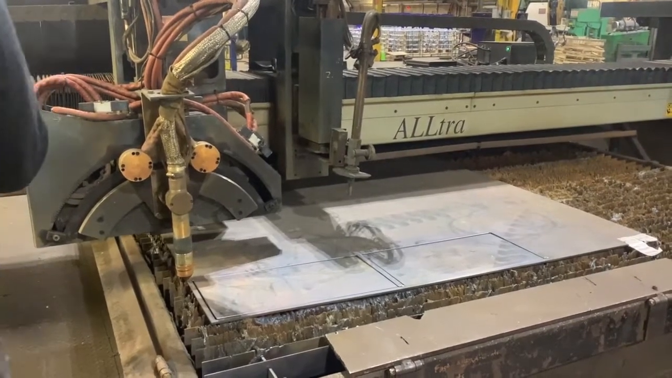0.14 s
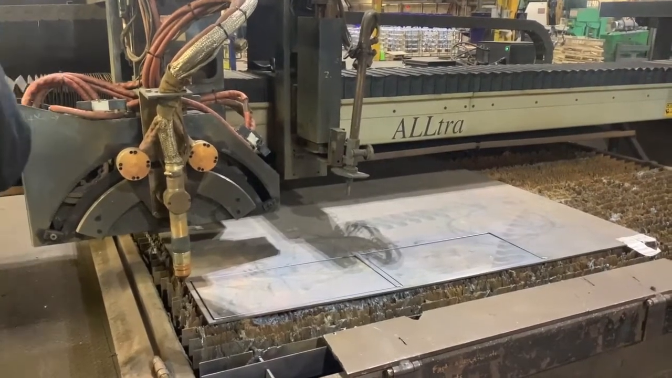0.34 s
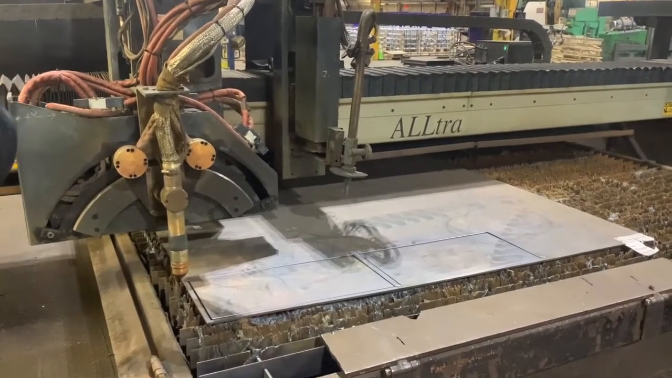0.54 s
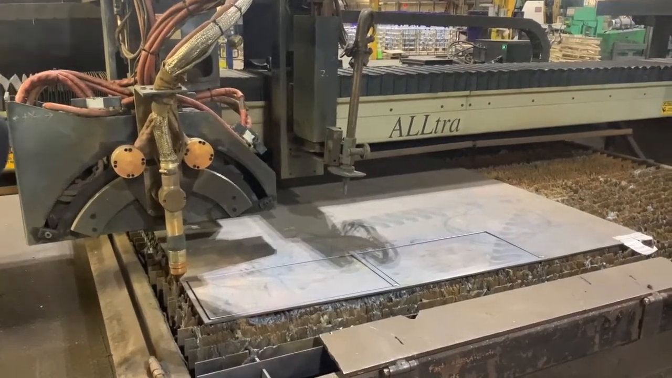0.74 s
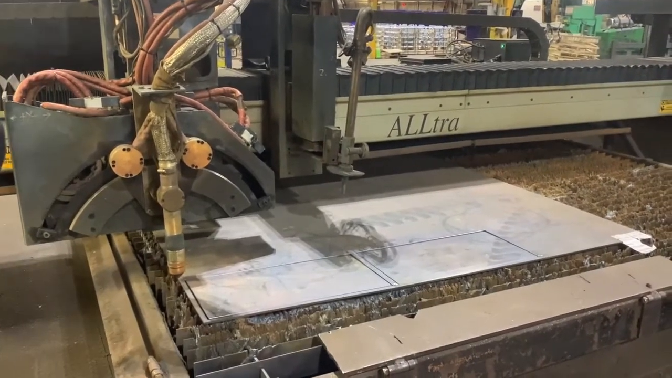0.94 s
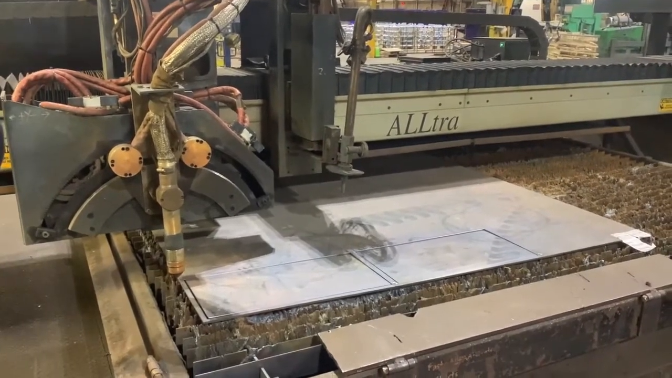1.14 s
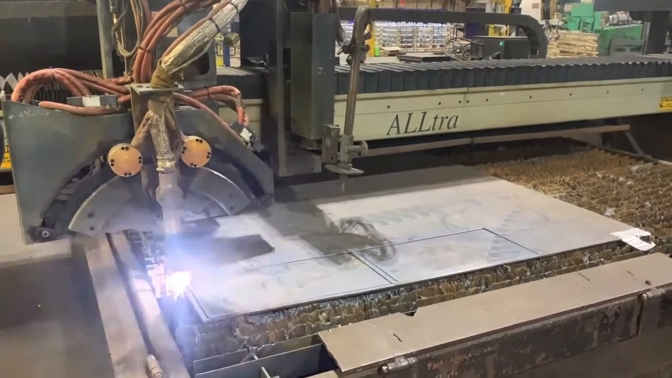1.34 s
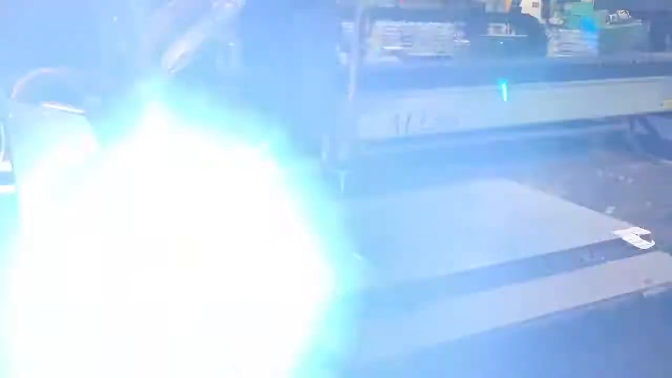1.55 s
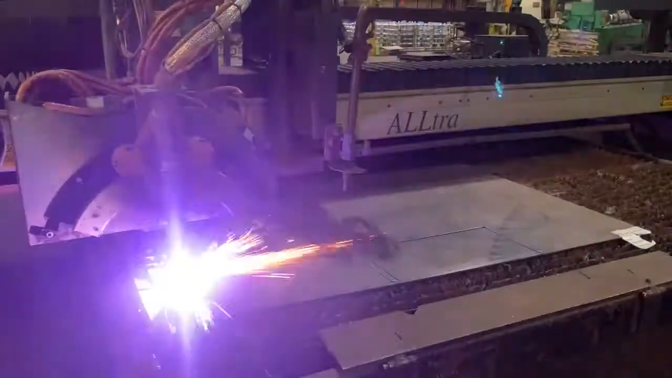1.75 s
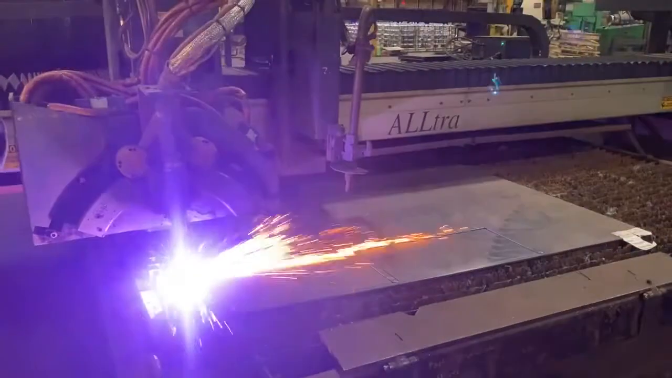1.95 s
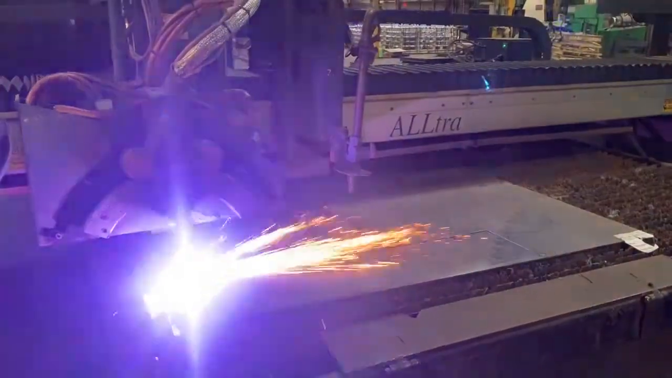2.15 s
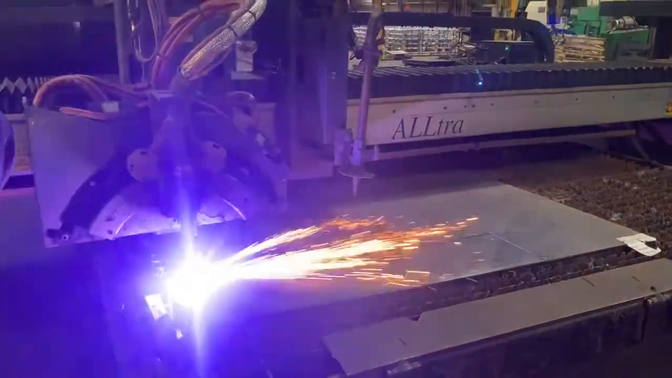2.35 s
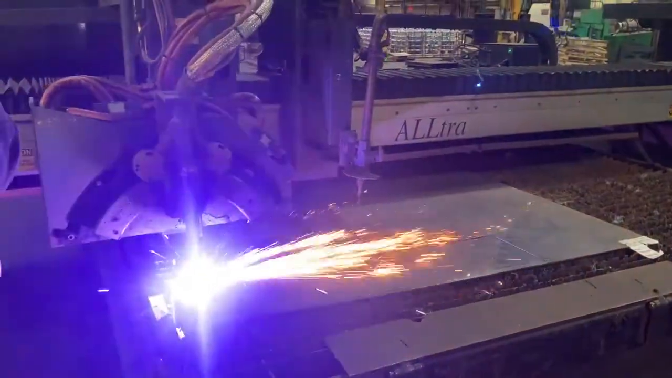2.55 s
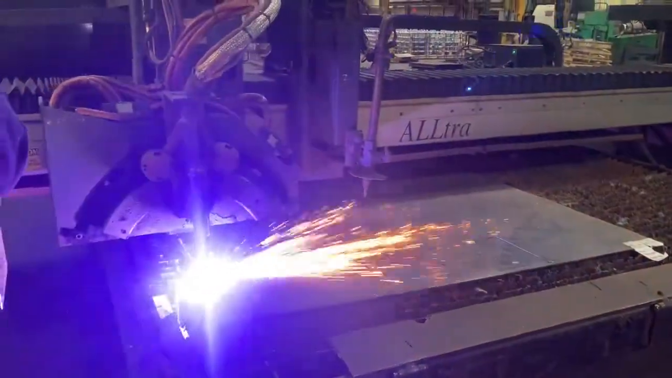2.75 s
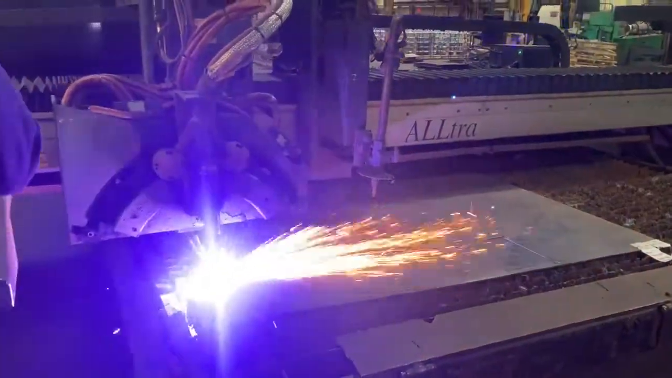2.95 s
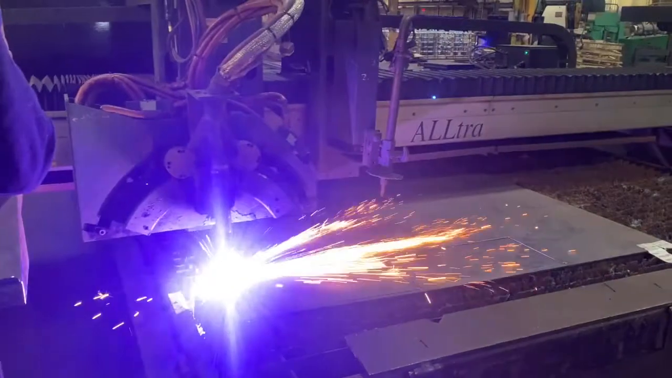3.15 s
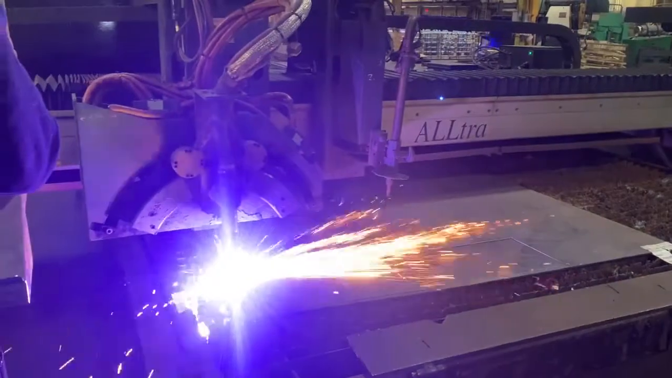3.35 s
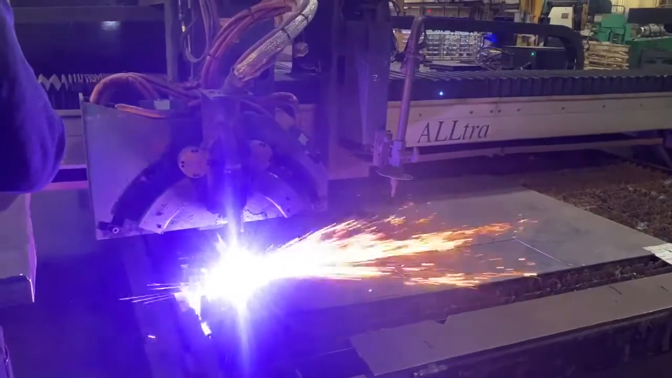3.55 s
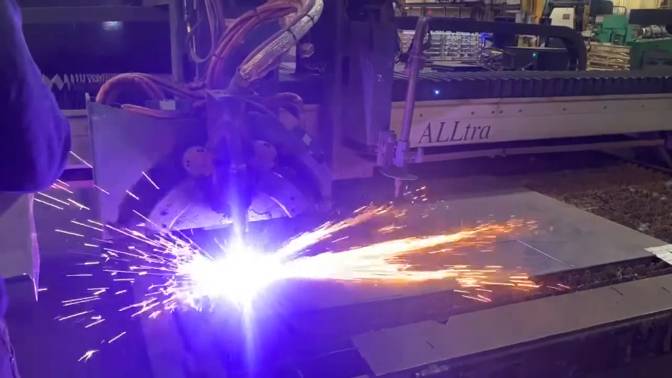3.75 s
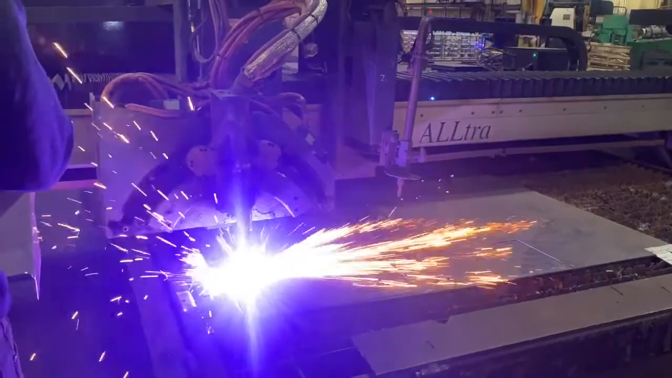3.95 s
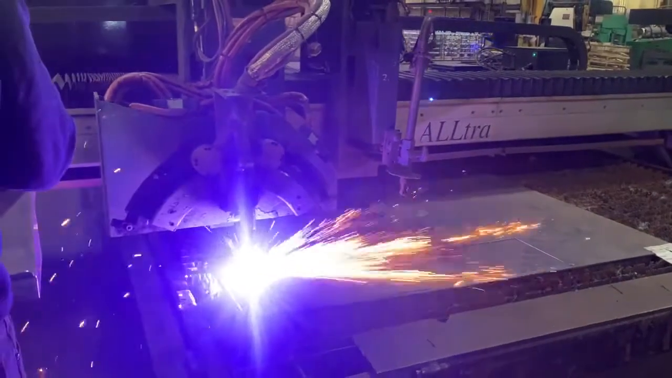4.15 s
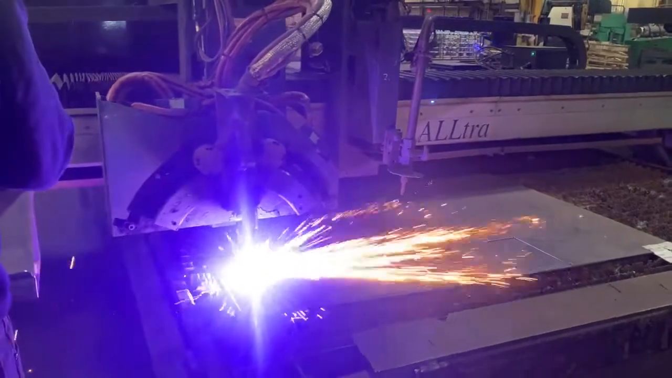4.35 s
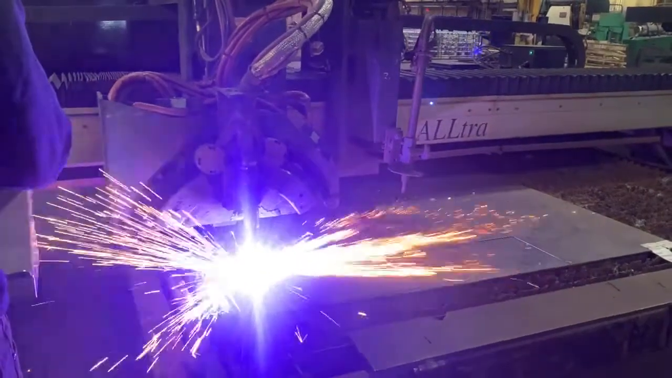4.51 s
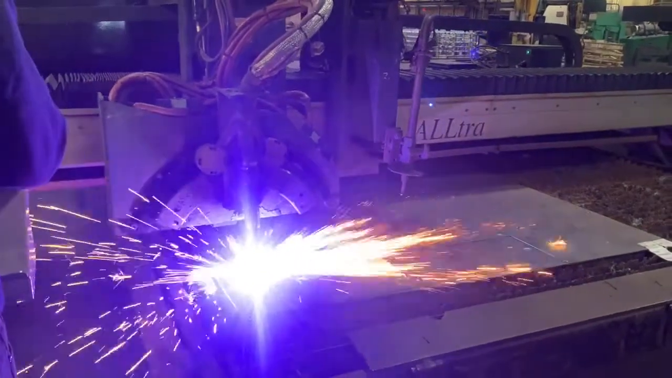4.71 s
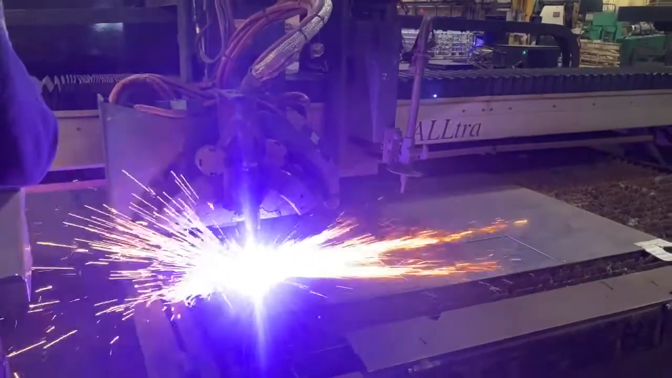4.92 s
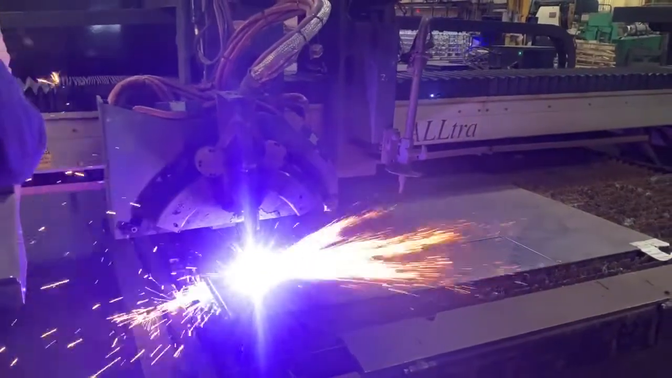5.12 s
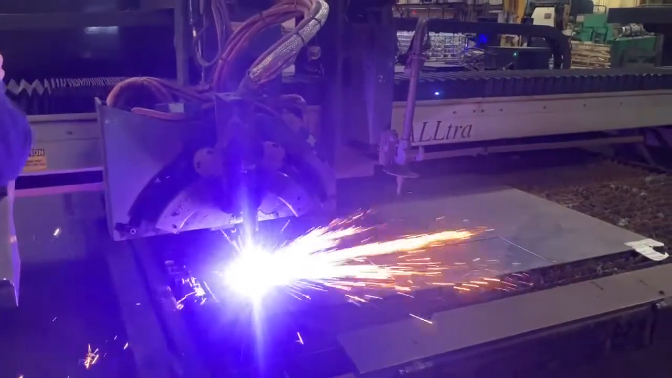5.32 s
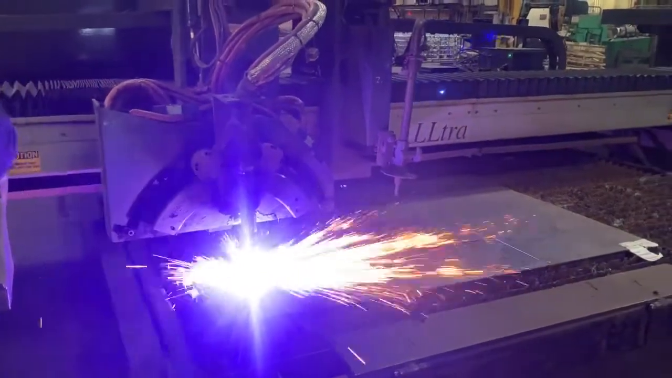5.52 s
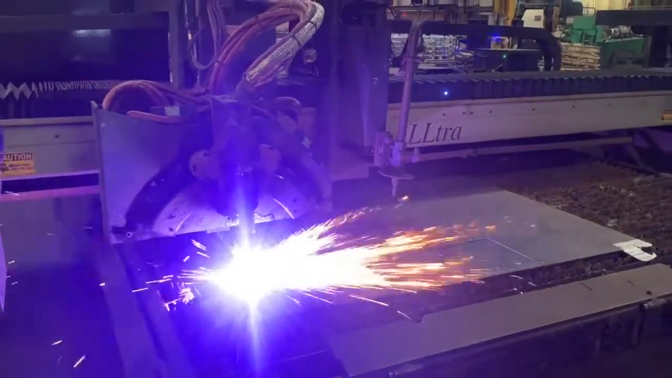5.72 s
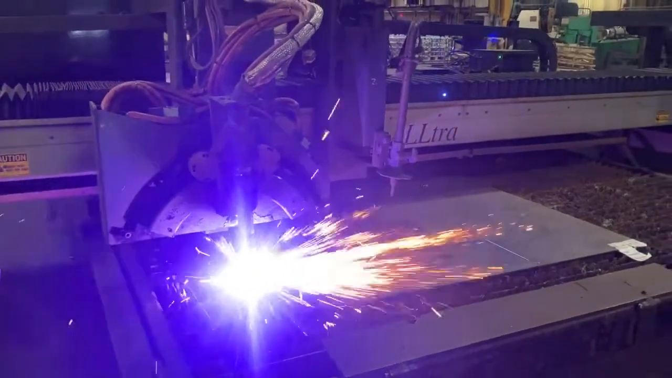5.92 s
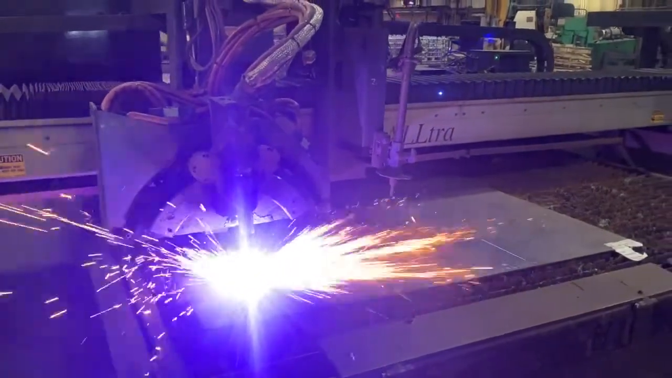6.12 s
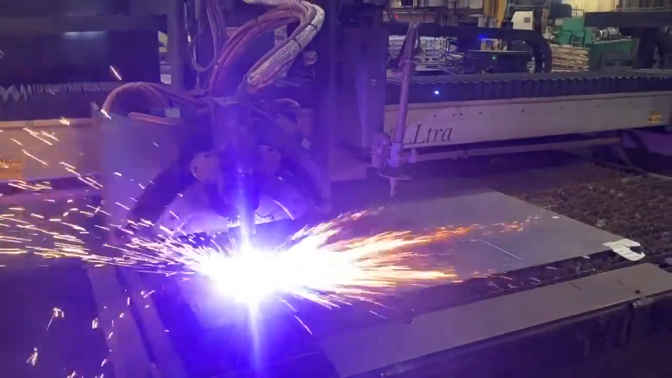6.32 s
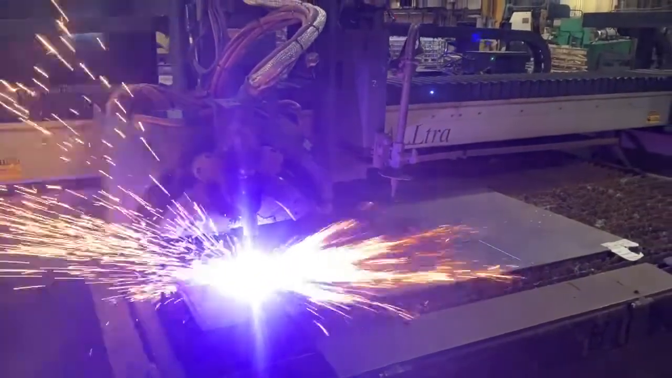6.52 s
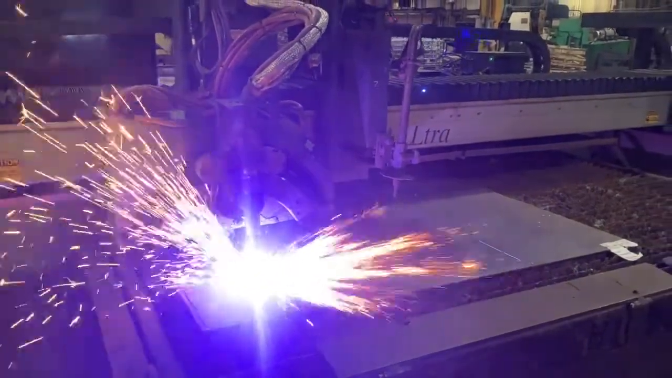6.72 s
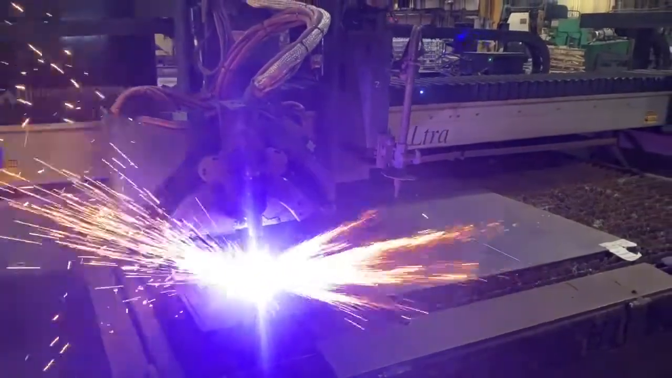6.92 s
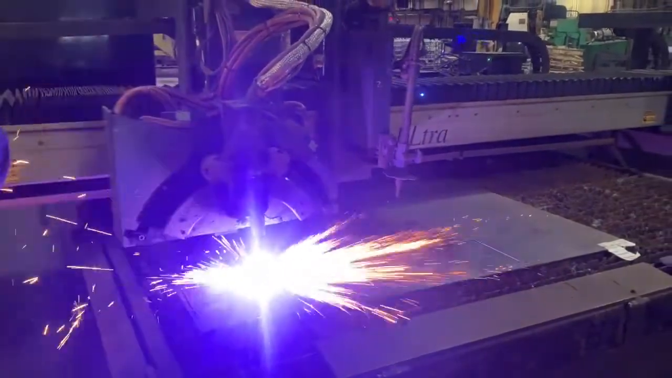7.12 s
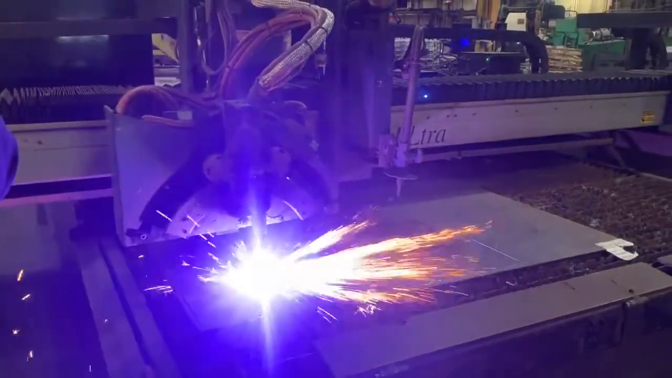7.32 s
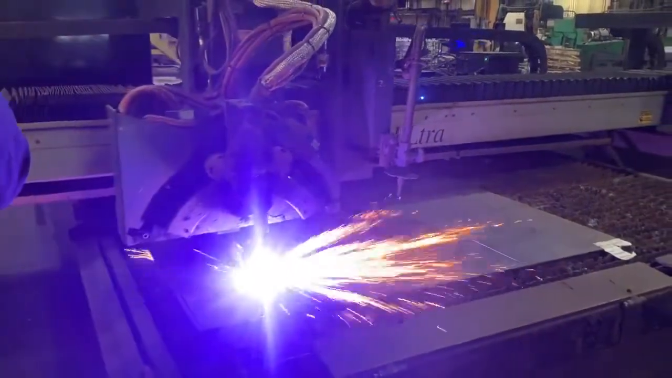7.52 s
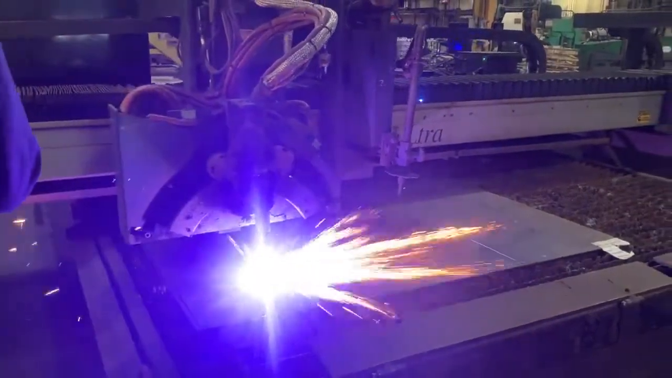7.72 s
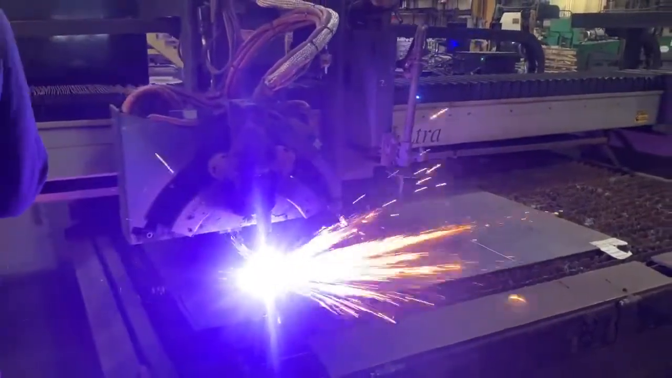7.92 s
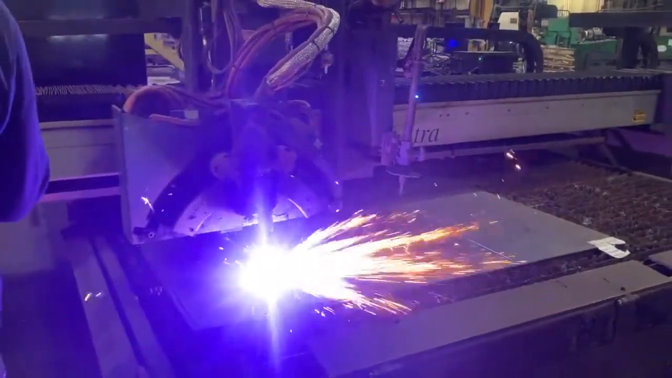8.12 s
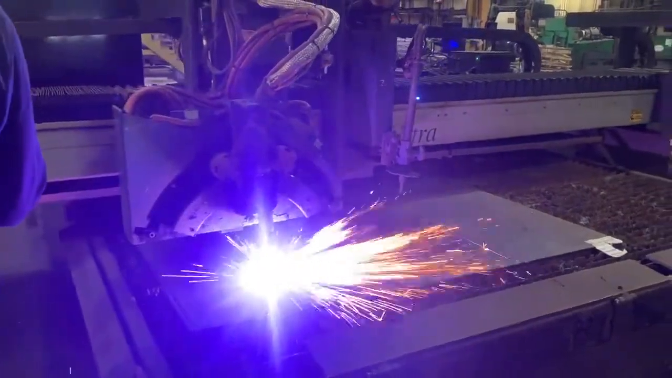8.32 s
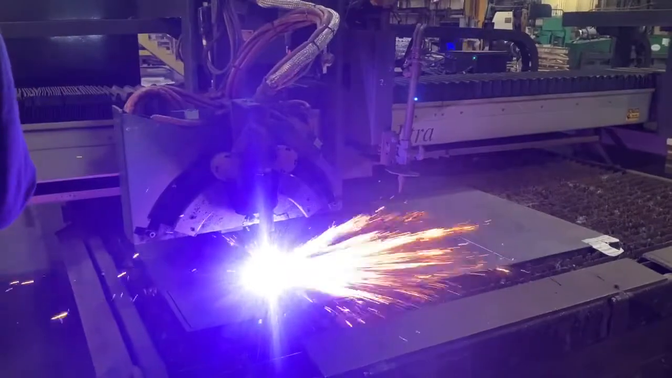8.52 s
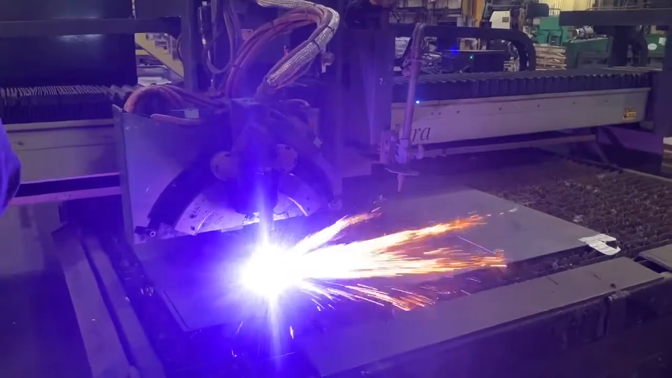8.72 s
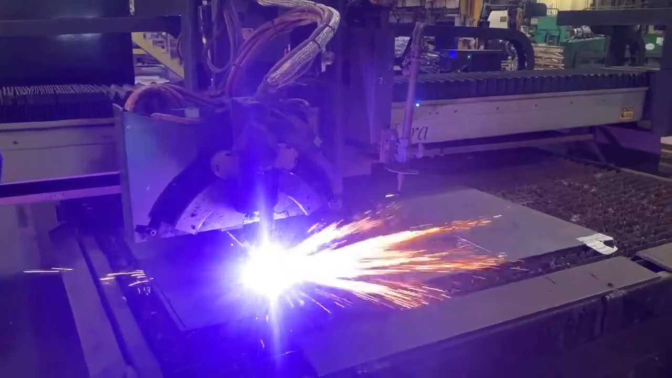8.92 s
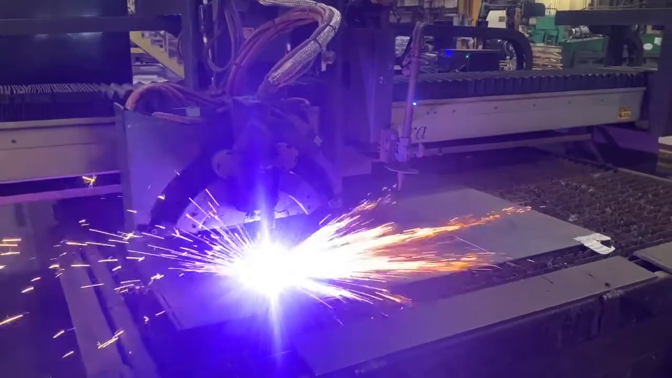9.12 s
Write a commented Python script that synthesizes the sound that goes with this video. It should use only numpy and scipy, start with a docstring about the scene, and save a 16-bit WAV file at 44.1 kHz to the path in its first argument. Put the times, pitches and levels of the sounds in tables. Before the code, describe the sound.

In a fabrication shop, low machine rumble and hum sit under a bright hiss of cold gas. After about a second the plasma arc strikes with a burst of puffs and crackle, and the shop sinks far behind it. A fluttering hiss continues, joined by a piercing squeal near 4 kHz that warbles widely, then steadies. Close stereo microphones.

```python
"""A plasma torch over steel plate in a workshop: a hissing arc jet under a warbling squeal near 4 kHz.
Before the strike, cold gas hisses from the nozzle over the rumble and hums of the shop. The arc strikes with
puffs and crackle, and the shop sinks behind it. Hiss and roar are coloured noise, rings and puffs are noise
narrowed round a centre, and the squeal is three multiples of one swinging pitch on two paths."""
import sys
import numpy as np
from scipy import signal
from scipy.fft import rfft, irfft, next_fast_len
from scipy.io import wavfile
from scipy.ndimage import uniform_filter1d

SR = 44100
rng = np.random.default_rng(int(sys.argv[2]) if len(sys.argv) > 2 else 0)


def generate_wav(signal):
    """Clip the signal to [-1, 1] and save it as 16-bit WAV at the path in sys.argv[1]."""
    frames = np.transpose(np.atleast_2d(signal))
    scaled = np.clip(frames, -1, 1) * 32767
    pcm = np.round(scaled).astype(np.int16)
    wavfile.write(sys.argv[1], SR, pcm)


N = 408366
STRIKE_S = 1.307  # the arc strikes


def gain_of(db):
    """Decibels to an amplitude factor."""
    return 10 ** (np.asarray(db) / 20)


def evened(x):
    """Scales to rms 1."""
    return x / np.sqrt(np.mean(x ** 2) + 1e-20)


def read(points, hz):
    """Reads a curve of (hz, value) at the given frequencies, straight between points on a log axis."""
    f, value = np.transpose(points)
    return np.interp(np.log(hz + 1), np.log(f + 1), value)


def follow(rows):
    """Columns of a time curve at every sample; a softened on/off mask of its span comes last."""
    s, *columns = np.transpose(rows)
    t = np.arange(N) / SR
    inside = 1.0 * ((t >= s[0]) & (t <= s[-1]))
    on = uniform_filter1d(inside, size=44, mode="nearest")
    return [np.interp(t, s, c) for c in columns] + [on]


def drift(hz):
    """Slow chance: noise low-passed at hz, rms 1."""
    low_pass = signal.butter(2, hz, fs=SR / 32, output="sos")
    coarse = signal.sosfilt(low_pass, rng.standard_normal(N // 32 + 1500))
    coarse = coarse[-N // 32 - 1:]  # drops the filter's start
    return evened(np.interp(np.arange(N) / 32, np.arange(len(coarse)), coarse))


def resonate(x, hz, width):
    """Shifts x down by hz, smooths with two equal poles (each width Hz wide), and shifts back; rms 1."""
    turn = np.exp(2j * np.pi * np.cumsum(hz * np.ones(x.shape[-1])) / SR)
    r = np.exp(-np.pi * width / SR)
    smooth = signal.lfilter([1], [1, -2 * r, r * r], x * turn.conj())
    return evened((turn * smooth).real)


def noise(colour, patchy_db):
    """Two unrelated noises (direct path, scattered path) of one colour with the same drifting patches."""
    frames, hz = N // 512 + 4, np.fft.rfftfreq(1024, 1 / SR)
    a, b, c, d, patches = rng.standard_normal((frames, 513, 5), dtype=np.float32).T
    patches = uniform_filter1d(patches, size=7, axis=0)
    patches = evened(uniform_filter1d(patches, size=8, axis=1))
    bins = np.array([a + 1j * b, c + 1j * d])
    bins = bins * gain_of(read(colour, hz)[:, None] + patchy_db * patches)
    window = np.sqrt(signal.windows.hann(1024, sym=False))  # keeps the power even across overlaps
    sound = signal.istft(bins, window=window, nperseg=1024, noverlap=512)[1]
    return evened(sound[:, :N])


def shop():
    """Rumble, wavering drones, steady hums, the lines of a motor and passing hums; most sink at the strike."""
    # Colour of the rumble: hz, density_db (dB per Hz, relative)
    rumble_colour = [(20, -50), (36, -11.5), (48, 0.5), (62, -19), (90, -15), (140, -15.5), (300, -21),
                     (420, -29.5), (1000, -32), (2500, -32.5), (6000, -53)]
    # Wavering machine drones: pitch_hz, width_hz, level_db (over the rumble)
    drones = [(53.7, 12.7, -3), (59.3, 8.9, -3.5), (85, 11.4, -10.5), (205.8, 18.4, -13.5)]
    # Steady machine hums: pitch_hz, level_db (rms over the rumble, before the strike)
    steady_hums = [(59.2, -6), (118.4, -19), (172.6, -11)]
    # Lines of the motor: multiple, peak_db (over the rumble's rms)
    motor_lines = [(1, -19.5), (2, -26), (3, -28.5)]
    # The motor's fourth multiple swells once: time_s, peak_db
    whine_curve = [(0, -77), (.3, -47), (.75, -34.5), (.99, -55), (1.3, -55), (1.36, -57.5), (9.3, -68)]
    # Thin hums that pass: start_s, end_s, level_db
    thin_hums = [(2.2, 3.5, -59), (4.2, 5.15, -64)]
    # A broad hum: time_s, level_db
    broad_curve = [(1.35, -53), (3.3, -56), (3.5, -62), (5.2, -66), (9.26, -64.5)]
    motor_hz, thin_hz, broad_hz, thin_edge_s = 372.6, 198.5, 345, 0.13
    shop_db, sunk_db, sink_s, sink_on_db_per_s = -30, -54.5, 0.075, -0.05
    hums_sink_db = -5  # the steady hums sink deeper than the rumble

    t = np.arange(N) / SR
    sunk = np.clip((t - STRIKE_S) / sink_s, 0, 1)
    level_db = shop_db + sunk * (sunk_db - shop_db + sink_on_db_per_s * (t - STRIKE_S))
    sound, air = noise(rumble_colour, 1.6), rng.standard_normal(N)
    for hz, width, db in drones:
        sound += gain_of(db) * resonate(air, hz, width)
    for hz, db in steady_hums:
        hum_db = db + 3 + hums_sink_db * sunk + 1.8 * drift(6.0)  # +3 turns rms into peak
        sound += gain_of(hum_db) * np.sin(2 * np.pi * hz * t + 0.4 * drift(8.0))
    turns = np.cumsum(motor_hz * (1 + 0.003 * drift(6.0))) / SR
    for k, db in motor_lines:
        line = np.sin(2 * np.pi * round(k) * turns + 0.7 * drift(9.0))
        sound += gain_of(db + 3.0 * drift(7.0)) * line
    whine = gain_of(follow(whine_curve)[0]) * np.sin(2 * np.pi * 4 * turns)
    thin = 0
    for a, b, db in thin_hums:
        thin = thin + gain_of(db) * np.clip(np.minimum(t - a, b - t) / thin_edge_s, 0, 1)
    broad_db, on = follow(broad_curve)
    passing = thin * resonate(air, thin_hz, 9.4)
    passing += on * gain_of(broad_db) * resonate(air, broad_hz, 39.0)
    return gain_of(level_db) * sound + whine + passing


def gas():
    """Cold gas hisses from the nozzle until the strike; its high ring holds, then fades."""
    # Colour of the cold gas: hz, density_db (dB per Hz, relative)
    gas_colour = [(1500, -22), (2500, -16), (3800, -13), (5300, -13), (6000, -8), (7500, -8), (8400, -4),
                  (11300, -7), (11900, -1), (12400, -3), (13600, -3), (14800, -.5), (15400, -5),
                  (16000, -5)]
    gas_db, ring_hz, ring_width_hz = -22.5, 12900, 420
    ring_over_hiss_db, hold_s, fade_db_per_s = -4, 0.14, 28

    t = np.arange(N) / SR
    hiss = noise(gas_colour, 1.3)
    ring = resonate(rng.standard_normal((2, N)), ring_hz, ring_width_hz)
    ring_db = ring_over_hiss_db - fade_db_per_s * np.maximum(t - hold_s, 0)
    return (t < STRIKE_S) * gain_of(gas_db) * (hiss + gain_of(ring_db) * ring)


def crackle():
    """Sharp sparks of uneven size while the arc takes hold: high-passed random clicks, dying away."""
    sparks_per_s, start_db, fade_db_per_s = 650, -18, 62
    age = np.arange(SR // 2) / SR
    draw, size = rng.random((2, len(age))), rng.standard_normal((2, len(age)))
    sparks = (draw < sparks_per_s / SR) * size * gain_of(start_db - fade_db_per_s * age)
    high_pass = signal.butter(2, 4800, "high", fs=SR, output="sos")
    out = np.zeros((2, N))
    out[:, round(STRIKE_S * SR):][:, :len(age)] = signal.sosfilt(high_pass, sparks)
    return out


def bursts():
    """Spatter bursts and knocks: short puffs of noise round a centre, rising at once and dying fast."""
    # Puffs: start_s, level_db (before the decay), centre_hz, width_hz, t60_s (time to fall 60 dB)
    puffs = [(1.3057, -19.5, 6060, 3980, 0.36), (1.396, -21, 5630, 2500, 0.16),
             (1.495, -23, 5650, 2500, 0.25), (1.308, -27, 2820, 500, 0.12), (1.418, -30, 2850, 500, 0.13),
             (1.49, -33, 2970, 500, 0.13), (1.591, -11, 8470, 600, 0.03), (1.606, -20, 8300, 1200, 0.06),
             (1.308, -37, 380, 200, 0.12), (1.375, -27, 6000, 3000, 0.2), (1.308, -42, 1070, 200, 0.13),
             (1.31, -19.5, 5060, 500, 0.5), (1.56, -25, 4900, 400, 0.2), (1.35, -33, 2840, 500, 0.24),
             (1.435, -27, 5800, 2500, 0.2), (1.865, -27, 8200, 3000, 0.037),
             (1.886, -28, 8200, 3000, 0.046), (8.39, -52, 290, 120, 0.25), (8.45, -50, 300, 150, 0.2),
             (8.535, -47, 300, 110, 0.3), (8.546, -41.5, 600, 345, 0.12), (8.546, -48, 950, 150, 0.15),
             (8.59, -48, 700, 150, 0.15)]
    age, out = np.arange(SR // 4) / SR, np.zeros((2, N))
    for s, db, hz, width, t60 in puffs:
        shape = (1 - np.exp(-age / 0.00092)) * gain_of(db - 60 * age / t60)
        puff = resonate(rng.standard_normal((2, len(age))), hz, width)
        out[:, round(s * SR):][:, :len(age)] += shape * puff
    return out


def nozzle():
    """Turbulence through the nozzle's broad resonance."""
    # Ring of the nozzle, strong while the arc pierces the plate: time_s, level_db
    ring_curve = [(1.31, -42), (1.46, -47), (1.6, -41), (2.0, -33), (2.1, -58), (2.9, -50), (3.1, -27.5),
                  (3.35, -39), (9.26, -42)]
    level_db, on = follow(ring_curve)
    return on * gain_of(level_db) * resonate(rng.standard_normal((2, N)), 8280, 430.0)


def jet():
    """Fizz, body, rasp and roar of the arc; molten steel makes all of it flutter together."""
    # Level of the fizz: time_s, level_db
    jet_curve = [(1.307, -14.5), (1.328, -16), (1.386, -21), (1.4, -18), (1.426, -17), (1.437, -22),
                 (1.456, -23.5), (1.48, -20.5), (1.497, -19), (1.566, -19.5), (1.6, -22), (1.63, -25),
                 (1.82, -25), (1.87, -25), (2.045, -24.5), (2.1, -27), (2.6, -27), (2.95, -29),
                 (3.075, -27), (3.45, -30.5), (4.2, -30.5), (4.9, -29.5), (5.5, -31.5), (6.1, -28),
                 (6.8, -30.5), (7.1, -32), (8.85, -32), (9.08, -29), (9.26, -29)]
    # Lower parts of the hiss: time_s, body_db, rasp_db (both over the fizz)
    blend_curve = [(1.31, -6.5, -18.5), (1.7, -2.5, -9.5), (3, -2.5, -9), (3.3, -4.5, -11), (4.6, -10, -11),
                   (5.6, -5, -12), (6.5, -6.5, -14.5), (7.5, -3.5, -12.5), (8.3, -6.5, -14),
                   (8.65, -7, -8.5), (9.26, -11, -12)]
    # Roar in the kerf: time_s, level_db, centre_hz (of the kerf's ring)
    roar_curve = [(1.31, -43, 970), (1.4, -48.5, 980), (2.45, -46.5, 1035), (3.2, -50.5, 961),
                  (3.45, -58.5, 930), (3.6, -50.5, 905), (4.1, -53.5, 845), (4.45, -53.5, 858),
                  (5.3, -59, 835), (5.7, -60.5, 830), (5.85, -52, 847), (6.2, -57.5, 850),
                  (6.7, -54.5, 781), (7.5, -54, 645), (7.7, -53.5, 677), (8.6, -52, 708),
                  (9.26, -53.5, 700)]
    # Ring of the kerf: time_s, level_db (over the roar)
    kerf_curve = [(1.31, 2), (7.2, -9.5), (7.7, -6), (9.26, -2)]
    # Colours of the four parts: hz, density_db (dB per Hz, relative)
    fizz_colour, body_colour = [(5000, -30), (8000, -6), (9400, -4), (10100, -7), (10800, -4), (11800, -3),
                                (12600, 0), (13500, -2), (14500, -3.5), (16000, -5.5)], [(3300, -25), (4000, -12), (4350, -10), (4750, -3),
                                              (5300, -5.5), (6000, -4), (6500, -1), (7200, -3), (7800, -1),
                                              (8400, 2), (9300, -4), (11000, -20)]
    rasp_colour, roar_colour = [(1300, -19.5), (1900, 5.5), (2300, -1.5), (2700, 5), (3100, 0.5),
                                (3500, 6.5), (3700, 7.5), (3900, 4), (4300, 6), (5000, -4.5)], [(200, -4.5), (330, -1), (450, -18), (650, 5.5), (1100, 1),
                                              (1300, 0), (1700, 1), (2200, -20)]

    level_db, on = follow(jet_curve)
    body_db, rasp_db, _ = follow(blend_curve)
    roar_db, kerf_hz, _ = follow(roar_curve)
    kerf_db, _ = follow(kerf_curve)
    flutter = drift(25.0)
    body, rasp = noise(body_colour, 2.0), noise(rasp_colour, 2.0)
    # body, rasp and roar each swell slowly on their own, in dB
    body_swell, rasp_swell, roar_swell = [1.1 * drift(4.0) for _ in range(3)]
    hiss = noise(fizz_colour, 2.05)
    hiss = hiss + gain_of(body_db + body_swell) * body + gain_of(rasp_db + rasp_swell) * rasp
    kerf = resonate(rng.standard_normal((2, N)), kerf_hz, 310.0)
    roar = noise(roar_colour, 2.2) + gain_of(kerf_db) * kerf
    hiss_gain = gain_of(level_db + 0.83 * flutter)
    roar_gain = gain_of(roar_db + roar_swell + 0.18 * flutter)
    return on * (hiss_gain * hiss + roar_gain * roar)


def scattered(z, lag, t60):
    """A tone (complex) on its direct and its scattered path, both blurred by reflections off plate and gantry."""
    # Short reflections, most while the squeal swings wide: time_s, level_db (over the unblurred tone)
    blur_curve = [(0, -14), (1.8, -14), (2, -4), (3, -3), (3.8, -4), (4.4, -9), (5.5, -12), (9.26, -13)]
    shimmer_rad = 0.9  # phase wander in the hot air
    t = np.arange(round(t60 * SR)) / SR
    taps = rng.standard_normal((2, SR))[:, :len(t)] * gain_of(-60 * t / t60)
    paths = np.array([z, z * np.exp(1j * (lag + shimmer_rad * drift(30.0)))]).imag
    blur = signal.oaconvolve(paths, taps / np.linalg.norm(taps[0]), axes=1)[:, :N]
    share = gain_of(follow(blur_curve)[0])
    return (paths + share * blur) / np.hypot(1, share)


def squeal():
    """The jet oscillates between nozzle and plate; its pitch swings fast and lingers at both ends of the swing."""
    # Strength of the tone: time_s, first_db, second_db (peak levels of the first two multiples)
    tone_curve = [(1.6, -44, -29), (1.635, -28, -36), (1.675, -20.5, -39), (1.75, -28, -29),
                  (1.79, -33, -31), (1.88, -29, -46), (2.03, -29.5, -48), (2.13, -29.5, -52),
                  (2.45, -28, -46), (2.62, -30, -34), (3.05, -30, -32), (3.2, -27.5, -30),
                  (3.37, -30.5, -31), (3.5, -29, -31), (4.03, -31, -30.5), (4.12, -29.5, -24.5),
                  (4.3, -31.5, -30.5), (5.0, -31, -29.5), (5.6, -30.5, -30), (5.9, -31, -26.5),
                  (6.5, -31.5, -34.5), (6.8, -32.5, -27.5), (7.4, -33, -33), (7.7, -30.5, -31),
                  (8.4, -30, -34), (9, -32, -31), (9.26, -31, -25.5)]
    # Depth of the warble: time_s, depth_percent
    depth_curve = [(1.6, .28), (1.78, .5), (1.9, 4.5), (2.1, 6), (2.9, 6), (3.2, 5), (3.37, 2.5), (3.5, 4),
                   (4.03, 3.4), (4.12, 1.4), (4.3, 2.2), (5, 1.8), (5.6, 1.3), (5.9, .8), (6.5, .75),
                   (6.8, 1.2), (7.4, .85), (7.7, 1.05), (9.26, 1)]
    # Centre of the squeal: time_s, pitch_hz
    pitch_curve = [(1.6, 4040), (1.64, 4022), (1.8, 4022), (2.1, 4130), (2.9, 4150), (3.7, 4200),
                   (4.2, 4190), (4.6, 4205), (5.8, 4225), (6.6, 4232), (7.5, 4250), (9.26, 4265)]
    # Turbulence roughens the first multiple into a hissing band: time_s, level_db (against the tone)
    hoarse_curve = [(1.6, -18), (1.8, -16), (2, -11), (3, -10), (3.5, -10), (4.4, -13), (5.8, -14),
                    (6.3, -12), (7.2, -12), (9.26, -13)]
    # Louder (or softer, if negative) at the top of the warble, first and second multiple: time_s, favour_db
    first_favour, second_favour = [(1.6, -3), (2.5, -2.5), (2.8, 1.5), (9.26, 1.5)], [(1.6, -4), (4, -4), (4.3, -2.5), (7.5, -2.5), (8.4, 1.5),
                                                   (9.26, 1.5)]
    # Lag of the first multiple's scattered path, shifting as the torch travels: time_s, phase_rad
    lag_curve = [(1.6, 1.3), (1.85, 1.3), (2.1, 3.5), (4, 3.6), (4.6, 2.8), (6.5, 2.9), (7.5, 2.3),
                 (9.26, 1.9)]
    warble_per_s, warble_wander, dwell, lopsided = 48, 0.05, 2.6, 0.15
    hoarse_hz, third_under_first_db, upper_lag_rad = 300, -11.5, 1.2

    first_db, second_db, on = follow(tone_curve)
    depth = follow(depth_curve)[0]
    angle = 2 * np.pi * np.cumsum(warble_per_s * (1 + warble_wander * drift(15.0))) / SR
    # a wide swing is quicker at one end
    cycle = np.sin(angle + lopsided * np.clip(depth / 3, 0, 1) * np.sin(angle + 1))
    warble = np.tanh(dwell * cycle) / np.tanh(dwell)
    swing = depth / 100 * np.maximum(1 + 0.12 * drift(30.0), 0) * warble
    wander = 0.0012 * np.clip(depth - 0.3, 0, 1) * drift(9.75)  # a calm tone holds its pitch
    jitter = 0.0065 * drift(217.0)
    turns = np.cumsum(follow(pitch_curve)[0] * (1 + swing + jitter + wander)) / SR

    hoarse = gain_of(follow(hoarse_curve)[0])
    turbulence = (drift(hoarse_hz) + 1j * drift(hoarse_hz)) / np.sqrt(2)
    rough = (1 + hoarse * turbulence) / np.hypot(1, hoarse)
    # the first multiple favours one end mostly in a wide swing
    uneven_db = follow(first_favour)[0] * warble * np.clip(depth / 4, 0, 1) ** 2
    first_gain = gain_of(first_db + uneven_db + 0.68 * drift(110.0))
    first = rough * first_gain * np.exp(2j * np.pi * turns)
    second_gain = gain_of(second_db + follow(second_favour)[0] * warble + 1.5 * drift(170.0))
    second = second_gain * np.exp(4j * np.pi * turns)
    third_gain = gain_of(first_db + third_under_first_db + 2.8 * drift(90.0))
    third = third_gain * np.exp(6j * np.pi * turns)
    lower = scattered(on * first, follow(lag_curve)[0], 0.22)
    return lower, scattered(on * (second + third), upper_lag_rad, 0.14)


def echoes(paths):
    """Nearby steel returns a few early copies that ripple the spectrum."""
    # Returns off plate, table and gantry: delay_ms, level_db
    returns = [(1.9, -23), (2.6, -45), (4.3, -26.5), (7.1, -12)]
    out = paths.copy()
    for ms, db in returns:
        late = round(ms * SR / 1000)
        out[:, late:] += gain_of(db) * paths[:, :-late]
    return out


def ports(paths):
    """Right hears the direct path; left hears it shifted in phase and mixed with the scattered path."""
    # Phase by which left leads: hz, phase_rad
    lead_curve = [(0, 0), (1000, .8), (1400, .3), (2100, 3.1), (2500, 6.2), (3500, 6.5), (3900, 8.9),
                  (4400, 8.9), (5400, 9.7), (6300, 12.3), (7000, 9.6), (8000, 12.4), (8700, 9.1),
                  (10200, 6.3), (15150, -3.1), (16000, -5.5)]
    # Likeness of left and right: hz, likeness (0-1); it peaks sharply at a few frequencies, deepening the holes
    # there
    alike_curve = [(60, .985), (140, .9), (330, .78), (600, .7), (1000, .6), (1500, .45), (2100, .9),
                   (3000, .45), (3600, .85), (4200, .72), (5000, .98), (6000, .5), (8400, .45),
                   (10200, .97), (11000, .8), (11800, .99), (12600, .85), (13500, .99), (14300, .8),
                   (15150, .99)]
    # Left minus right: hz, level_db
    lean_curve = [(60, -2.5), (250, -3), (600, 3.5), (1200, 3), (1800, -0.5), (3500, 0.5), (4200, -1.5),
                  (5000, 4), (6000, -4.5), (6600, 0), (7300, -0.5), (8400, -3.5), (10000, 0), (15000, -0.5)]
    size = next_fast_len(N + 4096)
    hz = np.fft.rfftfreq(size, 1 / SR)
    direct, other = rfft(paths, size)
    alike = np.clip(read(alike_curve, hz), 0, 1)
    lean = gain_of(read(lean_curve, hz) / 2)
    lead = np.exp(1j * np.interp(hz, *np.transpose(lead_curve)))
    left = alike * direct * lead + np.sqrt(1 - alike ** 2) * other
    return irfft(np.array([left * lean, direct / lean]), size)[:, :N]


def beamed(paths, beam):
    """A tone through the ports, leaning further to one side as the beam curve moves."""
    lean = gain_of(follow(beam)[0] / 2)
    return ports(paths) * np.array([lean, 1 / lean])


def scene():
    """Noises share the echoes and the ports; the squeal's multiples beam on their own."""
    # Beams of the first and of the upper multiples: time_s, lean_db (left minus right, beyond the ports)
    first_beam, upper_beam = [(1.6, -1.5), (1.9, -2), (2.1, -3.5), (2.9, -4), (3.4, -4.5), (5.6, -7.5),
                              (7.4, -6.5), (9.26, -4.5)], [(1.6, -3), (3.3, 1), (4, 0.5), (5.6, -4), (6.1, 7.5),
                                                  (9.26, 3.5)]
    first, upper = squeal()
    noises = shop() + gas() + jet() + nozzle() + bursts() + crackle()
    return ports(echoes(noises)) + beamed(first, first_beam) + beamed(upper, upper_beam)


def record(dry):
    """The microphones lose the deepest bass; then the band limit."""
    bass_hz, edge_hz = 45, 15790
    high_pass = signal.butter(4, bass_hz, "high", fs=SR, output="sos")
    thinned = signal.sosfilt(high_pass, dry)
    band_limit = signal.firwin(2047, edge_hz, window=("kaiser", 9), fs=SR)
    return signal.oaconvolve(thinned, band_limit[None], "same")


dry = scene()
out = record(dry)
generate_wav(out)
```